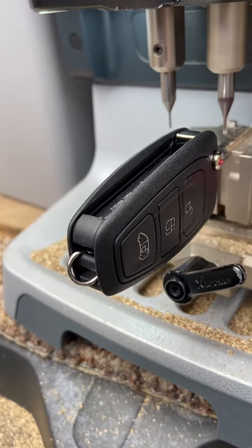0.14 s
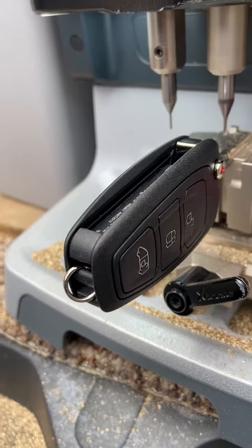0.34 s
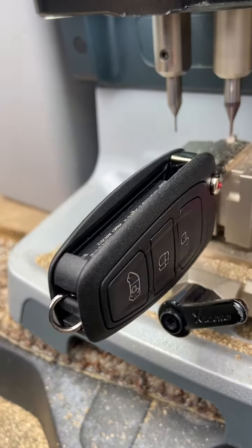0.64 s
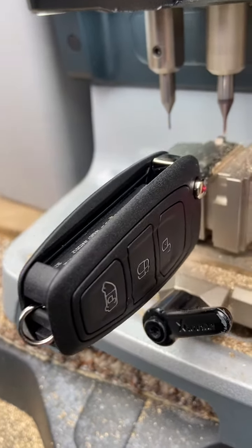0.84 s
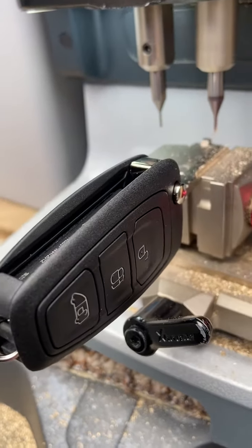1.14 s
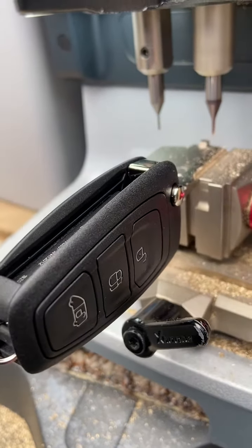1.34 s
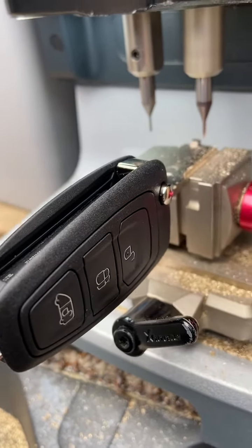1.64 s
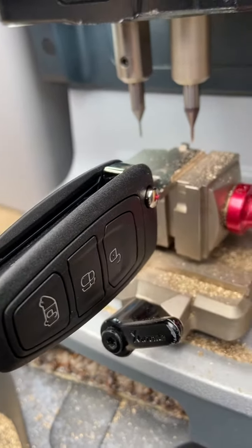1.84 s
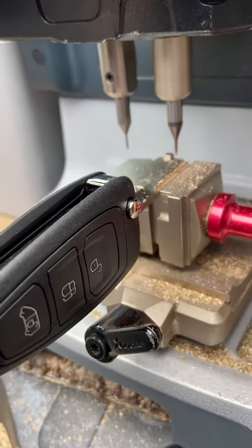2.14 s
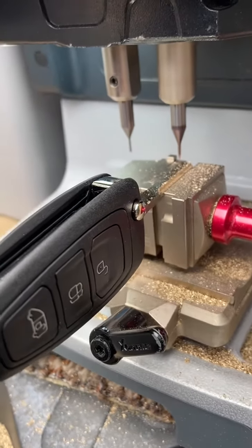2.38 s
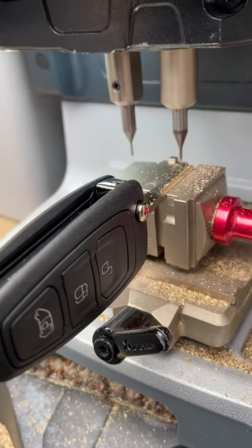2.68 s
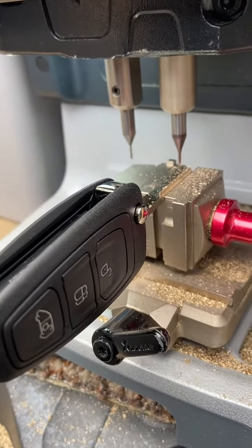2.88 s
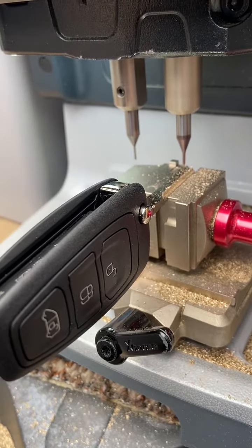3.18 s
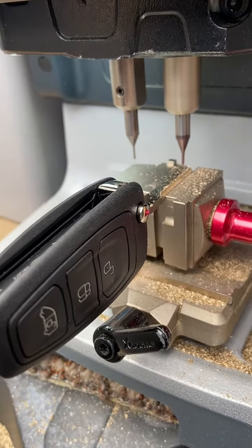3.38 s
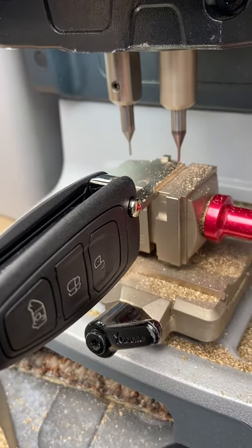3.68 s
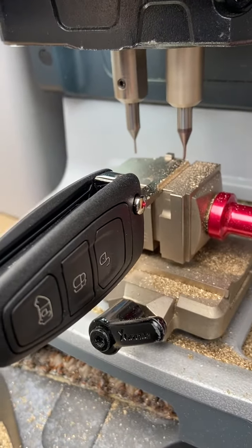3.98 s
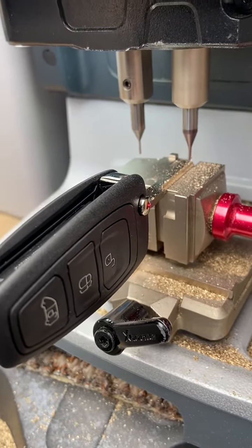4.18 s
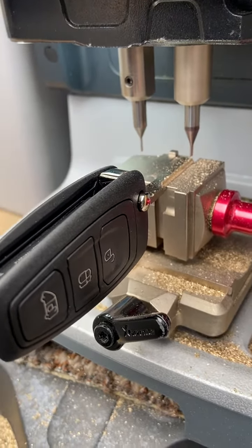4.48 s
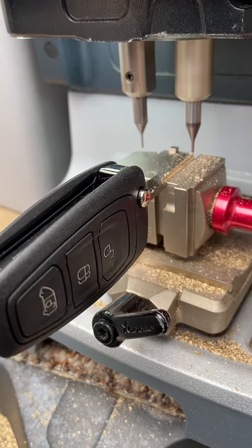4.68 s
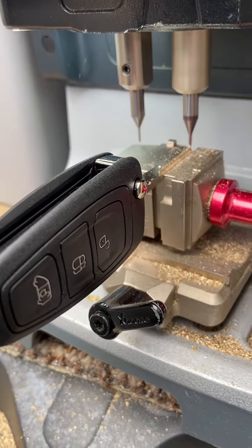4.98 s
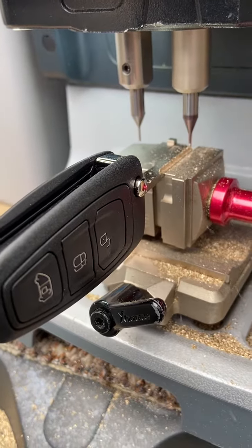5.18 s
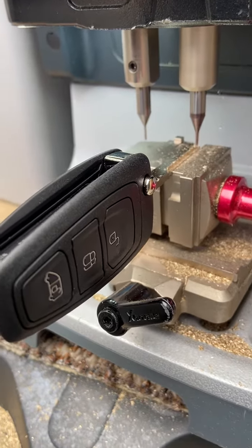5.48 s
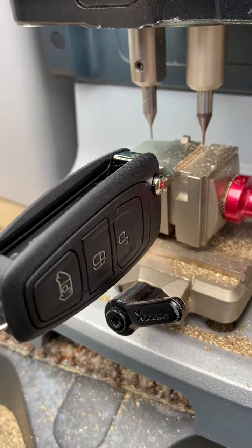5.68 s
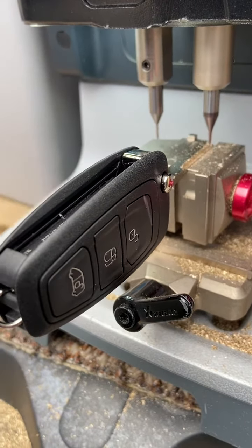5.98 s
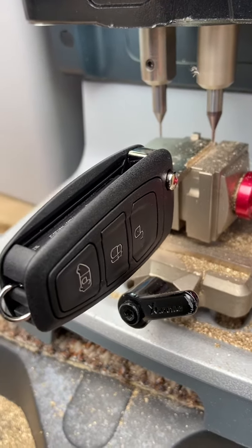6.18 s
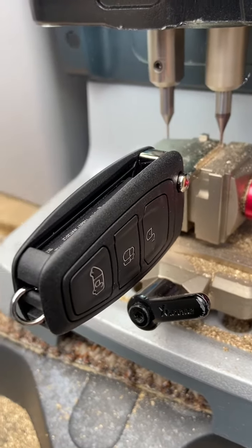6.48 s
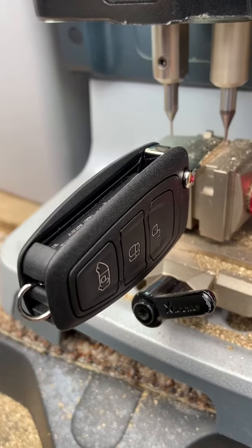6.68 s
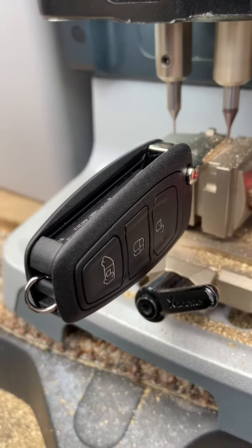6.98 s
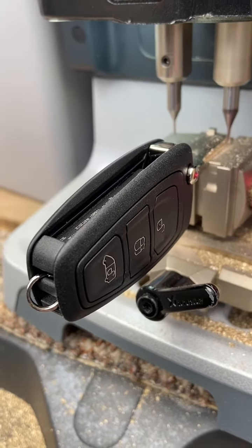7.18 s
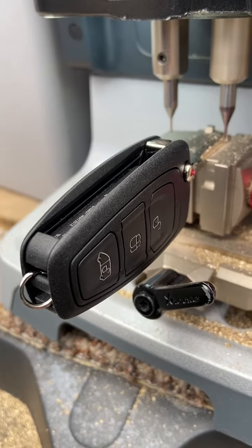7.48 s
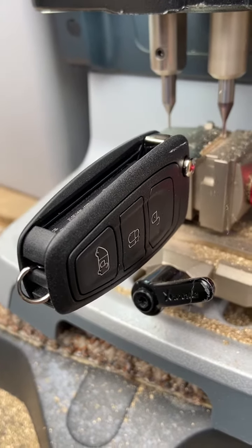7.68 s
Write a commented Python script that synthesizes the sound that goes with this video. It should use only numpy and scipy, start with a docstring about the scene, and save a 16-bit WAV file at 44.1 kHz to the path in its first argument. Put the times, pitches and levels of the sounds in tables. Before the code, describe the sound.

Close idle spindle whine and singing stepper motors under thumping air gusts; after several seconds the cutter starts grinding metal with a nasal, changing buzz.

```python
"""A key-cutting machine close to a phone: a cutter bites into a brass blade and buzzes, grinds and sprays chips.
The buzz is sines on multiples of the spindle turns; grinding and chips are noise ringing in the cast body.
The idle spindle hums, whines and rushes, and stepper motors sing at their step rate.
Short rasps of hiss and a falling chirp join in, and gusts of air (shaped noise) buffet the two microphone ports."""
import sys
import numpy as np
from scipy import signal
from scipy.fft import rfft, irfft
from scipy.io import wavfile
from scipy.ndimage import uniform_filter1d

SR = 44100
rng = np.random.default_rng(int(sys.argv[2]) if len(sys.argv) > 2 else 0)


def transcribe(u):
    """Save the signal u as a 16-bit wav file named by the first command-line argument.

    u: samples, shape (n,) or (channels, n), limited to [-1, 1]; the rate is SR.
    q: integer samples, one column per channel.
    """
    v = np.clip(np.atleast_2d(u).T, -1, 1)
    q = np.round(v * 32767).astype(np.int16)
    wavfile.write(sys.argv[1], SR, q)


N = 345744
TIME = np.arange(N) / SR  # s
FREQ = np.maximum(np.fft.rfftfreq(N, 1 / SR), 1)  # Hz

IDLE_HZ = 231.47  # spindle turns a second, unloaded
BITE_S, SETTLED_S = 4.632, 5.03  # the cutter touches the blade; its roughness changes after the bite
# resonances of cast body and cover: f/Hz, width/Hz, bearing rush level/dB, grinding level/dB
BODY = [(181, 146, 4.5, -25), (595, 254, 2.5, 2.5), (1067, 520, -2.5, -0.5), (1944, 275, 1.5, 6),
        (2430, 930, -6.5, -5.5), (3280, 800, 0.5, -4), (3720, 360, -0.5, -2.5), (4330, 1600, -5, -16),
        (4930, 650, -5.5, -9.5), (6346, 540, -4, -6), (8300, 140, -24, -2), (7420, 3700, -9.5, -14.5)]
# thin treble resonances: f/Hz, width/Hz, bearing rush level/dB, chip spray level/dB
CHIPS = [(8870, 670, -30, -11), (10620, 1220, -13, -3), (12000, 1040, -15.5, 0), (14700, 900, -16.5, 0)]


def undb(db):
    """Turn dB into gain."""
    return 10 ** (np.asarray(db) / 20)


def unit(x):
    """Scale to an rms (average strength) of 1."""
    return x / np.sqrt(np.mean(x ** 2))


def curves(rows):
    """Join the columns of a table by straight lines in time; the first column is t/s."""
    s, *columns = np.transpose(rows)
    return [np.interp(TIME, s, c) for c in columns]


def along(points):
    """Join (f/Hz, value) points by straight lines on a log frequency axis."""
    hz, value = np.transpose(points)
    return np.interp(np.log(FREQ), np.log(np.maximum(hz, 20)), value)


def walk(rate):
    """Wander at random: levels held for 1 / rate seconds, smoothed twice, with an rms of 1."""
    hold = int(SR / rate)
    steps = np.repeat(rng.standard_normal(N // hold + 1), hold)
    smooth = uniform_filter1d(uniform_filter1d(steps, hold), hold)
    return unit(smooth[:N])


def stretch(start, end, db0, db1, fade):
    """Gain that fades in, runs from one level to another and fades out."""
    window = np.clip(np.minimum(TIME - start, end - TIME) / fade + .5, 0, 1)
    return window * undb(np.interp(TIME, [start, end], [db0, db1]))


def ring(drive, modes, column, flicker_db):
    """Pass a drive through steep resonances, each flickering by itself; column picks their levels."""
    spectrum = rfft(drive)
    total = 0
    for k, mode in enumerate(modes):
        hz, width = mode[:2]
        gain = undb(mode[column] + flicker_db * walk(15))
        response = 1 / (1 + 1j * (FREQ - hz ** 2 / FREQ) / width) ** 2
        # one idle turn apart, so that neighbours do not cancel
        total = total + gain * np.roll(irfft(spectrum * response, N), int(k * SR / IDLE_HZ))
    return total


def lines(turns, orders, waver_db, rate=9, locked=False):
    """Add wavering sines on multiples of a running turn count; 0 dB is rms 1, start angles random unless locked."""
    total = 0
    for multiple, db in orders:
        gain = np.sqrt(2) * undb(db + waver_db * walk(rate))
        angle = (not locked) * rng.random()
        total = total + gain * np.sin(2 * np.pi * (multiple * turns + angle))
    return total


def airflow():
    """Gains of rumble, flutter and crosswind: calm air, spells of breeze, and bell-shaped gusts; powers add."""
    # breeze: from t/s, to t/s, rumble start level/dB, end level/dB,
    # flutter level/dB against the breeze, crosswind level/dB against the smoothed total rumble
    spells = [(-.1, 0.428, -35, -37, -34, -9.5), (.43, 1.153, -38.5, -38.5, -30, -17),
              (1.148, 1.62, -36, -42.5, -23, -14.5), (1.7, 2.34, -48, -52, -9, -10),
              (2.95, 3.282, -48, -37, -20, -9.5), (3.252, 3.668, -27.5, -35, -18, -14),
              (4.12, 4.702, -33, -23, -12, -11), (4.61, 4.902, -31, -33, -18, -9.5),
              (4.902, 5.32, -28, -34, -17, -2.5), (5.35, 5.944, -38.5, -39, -27, -10.5),
              (6.42, 6.65, -42, -49, -22.5, -18), (6.69, 6.893, -63, -49, -15, 12.5),
              (6.93, 7.6, -45, -40, -17, -13)]
    # gusts that stand out: t/s, rumble level/dB, flutter level/dB, time to fall 6 dB/ms
    gusts = [(0.021, -27.5, -51, 12), (0.292, -30, -54, 12), (0.376, -23.5, -52, 35), (0.503, -23, -46, 11),
             (0.632, -28.5, -48, 24), (0.87, -25.5, -54, 18), (1.049, -23.5, -56, 9.9),
             (1.21, -24, -38, 23), (1.302, -29, -44, 25), (1.399, -27.5, -52, 18), (1.46, -27, -53, 33),
             (1.538, -29.5, -60, 23), (3.273, -23.5, -12.5, 4.4), (3.296, -12, -23, 13.5),
             (3.327, -18, -16.5, 8.6), (3.344, -14, -18.5, 15), (3.362, -15, -20, 6.1),
             (3.488, -21, -33, 6.8), (3.543, -22, -28, 6.5), (3.595, -29, -31, 18), (4.12, -26, -18, 4),
             (4.129, -20, -44, 9.9), (4.206, -20.5, -21.5, 33), (4.262, -10.5, -16, 9),
             (4.283, -23, -17, 8), (4.351, -18, -26, 14), (4.392, -15.5, -19.5, 6), (4.342, -30, -24, 6),
             (4.415, -31, -21, 8.5), (4.44, -30, -22, 7), (4.465, -28, -25, 11), (4.5, -21, -18.5, 14),
             (4.537, -14.5, -11, 18.5), (4.608, -20, -26, 20), (4.695, -16.5, -23, 13),
             (4.752, -14, -21, 8.6), (4.875, -22.5, -31, 25), (4.981, -27, -38, 28),
             (5.044, -31, -24.5, 12), (5.076, -23.5, -43, 19), (5.132, -24, -48, 9.4),
             (5.259, -26, -45, 13)]
    calm_db, calm_flutter_db, calm_cross_db = -52.5, -71, -61.5
    spell_fade_s, cross_smear_s = 0.043, 0.094
    rise_share = 0.94  # a gust rises in this share of the time it falls

    rumble = np.full(N, undb(calm_db) ** 2)
    flutter = np.full(N, undb(calm_flutter_db) ** 2)
    turned = np.zeros(N)
    for start, end, db0, db1, flutter_db, cross_db in spells:
        breeze = stretch(start, end, db0, db1, spell_fade_s) ** 2
        rumble += breeze
        flutter += breeze * undb(flutter_db) ** 2
        turned += stretch(start, end, cross_db, cross_db, spell_fade_s) ** 2
    for s, rumble_db, flutter_db, half_ms in gusts:
        near = slice(max(int((s - .2) * SR), 0), int((s + .2) * SR))
        late = 1000 * (TIME[near] - s) / half_ms
        bell = undb(-6 * (late / np.where(late < 0, rise_share, 1)) ** 2) ** 2
        rumble[near] += bell * undb(rumble_db) ** 2
        flutter[near] += bell * undb(flutter_db) ** 2
    cross = turned * uniform_filter1d(rumble, int(cross_smear_s * SR)) + undb(calm_cross_db) ** 2
    return np.sqrt(rumble), np.sqrt(flutter), np.sqrt(cross)


def wind(rumble, flutter, cross):
    """Eddies on the ports: rumble, flutter, and a crosswind part of opposite sign left and right."""
    # tone of the rumble: f/Hz, level/dB
    rumble_tone = [(20, -23), (35, -8.5), (60, 4.5), (100, 1), (160, -3), (260, -5.5), (500, -49.5)]

    def eddies(shape_db, lump_db):
        """Noise of a given spectrum that comes in lumps."""
        noise = irfft(rfft(rng.standard_normal(N)) * undb(shape_db), N)
        # a gust holds few, even eddies: halve the swings in level (in dB) over 25 ms
        loudness = np.sqrt(uniform_filter1d(noise ** 2, size=1100))
        even = noise / loudness ** .5
        return undb(lump_db * walk(30.1)) * unit(even)

    octave = np.log2(FREQ / 300)  # octaves above 300 Hz
    # strong gusts reach higher in pitch
    high = eddies(-16 * (octave - 1.1) ** 2, lump_db=1.0) * 1.6 * flutter ** 0.9
    low_flutter = eddies(-10 * octave ** 2, lump_db=2.0)
    both = rumble * eddies(along(rumble_tone), lump_db=1.66) + 0.96 * flutter * (low_flutter + high)
    cross_low = eddies(-4 * (octave + 1.0) ** 2, lump_db=4.0)
    cross_high = 2.2 * cross ** 0.37 * eddies(-9 * (octave - .9) ** 2, lump_db=7.0)
    apart = cross * (cross_low + cross_high)
    band = signal.butter(3, [32, 1400], "bandpass", fs=SR, output="sos")
    return signal.sosfilt(band, [both + apart, both - apart])


def chirps():
    """Short falling tones as the braked motor stops: sines whose pitch slides down."""
    # from t/s, to t/s, from f/Hz, to f/Hz (each sounds at 0.94 of this), start level/dB, end level/dB
    falls = [(1.043, 1.09, 5350, 3400, -48, -51)]
    total = 0
    for s0, s1, hz0, hz1, db0, db1 in falls:
        cycles = np.cumsum(np.interp(TIME, [s0, s1], [hz0, hz1])) / SR
        total = total + stretch(s0, s1, db0, db1, .01) * lines(cycles, [(0.94, 0)], waver_db=6.0, rate=120)
    return total


def scrape():
    """Short rasps: noise through one resonance, swelling and fading as a bell."""
    # centre t/s, f/Hz, width/Hz, level/dB, half length/s
    rasps = [(1.3, 5700, 350, -42, .006), (0.92, 5150, 350, -46, .008), (5.77, 10500, 6000, -42, .015),
             (4.637, 1910, 250, -30, .005), (7.425, 3600, 600, -37, .014)]
    total = 0
    for s, hz, width, db, half in rasps:
        bell = np.exp(-((TIME - s) / half) ** 2)
        hiss = unit(ring(rng.standard_normal(N), [(hz, width, 0)], column=2, flicker_db=2))
        total = total + undb(db) * bell * hiss
    return total


def carriage():
    """Stepper motors sing at multiples of their step rate; braking, they slide down and change colour."""
    # each move: (from t/s, brakes at t/s, to t/s, steps f/Hz), (start level/dB, end level/dB),
    # then sounding lines: multiple of the step rate, level/dB, change when fully braked/dB
    moves = [((-.1, .865, 1.055, 1330), (-44, -44), [(1, 0.5, -10), (2, -9, -30), (3, -4, -50),
             (4, -8, -38)]), ((-.1, .09, .232, 1330), (-48, -45), [(.5, -7, 9), (1, 0.5, -8), (2, -6, 12)]),
             ((1.125, 9, 2.79, 1199), (-42, -43), [(.5, -13.5, 0), (1, -20, 0), (2, 0.5, 0), (3, -18, 0),
             (4, 1.5, 0)]), ((2.8, 9, 4.62, 1187.5), (-44.5, -45), [(.25, -1.5, 0), (1, -0.5, 0),
             (2, -8.5, 0), (3, -10, 0), (5, -19, 0)]), ((6.6, 9, 7.01, 1160), (-48, -36.5), [(.25, 0, 0)]),
             ((4.7, 9, 6.12, 1181.8), (-54, -55), [(4, 0, 0)]), ((6.12, 9, 6.55, 1199.3), (-54, -54),
             [(4, 0, 0)]), ((6.98, 9, 7.42, 1199.3), (-52, -52), [(4, 0, 0)]), ((7.4, 9, 7.75, 1186),
             (-55, -55), [(4, 0, 0)])]
    brake_hz_per_s, brake_ease_s, creep_hz = 8500, .3, 765  # braking sets in gently, down to a creep at most
    slide_hz, slide_width_hz, slide_db = 790, 60, 16  # the slide rings when a line passes its pitch
    total = 0
    for (start, brake, end, top_hz), (db0, db1), orders in moves:
        late = np.maximum(TIME - brake, 0)
        hz = np.maximum(top_hz - brake_hz_per_s * late ** 2 / (late + brake_ease_s), creep_hz)
        braked = (top_hz - hz) / (top_hz - creep_hz)  # 0 at full speed, 1 at the creep
        heard = []
        for multiple, line_db, change_db in orders:
            boost_db = slide_db * np.exp(-((multiple * hz - slide_hz) / slide_width_hz) ** 2)
            heard.append((multiple, line_db + change_db * braked + boost_db))
        gain = stretch(start, end, db0, db1, .02) * undb(2.3 * braked * walk(30.6))
        total = total + gain * lines(np.cumsum(hz) / SR, heard, waver_db=0.85, locked=True)
    return total


def spindle(turns, gust_db):
    """Unbalance hums once a turn, poles whine on multiples, bearings rush as noise, drive tones stay steady."""
    # the machine as the phone drifts about: t/s, motor whine level/dB, bearing rush level/dB
    nearness = [(0, -39, -39), (.5, -38, -39.5), (1.5, -39.5, -40), (2.7, -43.5, -39.5),
                (3.25, -44.5, -38.5), (3.45, -43.5, -39.5), (4.1, -45, -39), (4.6, -45, -38.5),
                (4.8, -44, -38), (5.3, -44.5, -39), (6.5, -44.5, -40.5), (7.3, -43.5, -38.5),
                (7.84, -39.5, -33)]
    # motor whine: multiple of the turn rate, level/dB against the whine level above
    whine_lines = [(10.5, -3.5), (21, 0), (21.655, -17), (42, -24), (63, -36)]
    # steady drive tones: f/Hz, level/dB at the start (then they follow the bearing rush)
    tones = [(522.6, -53.5), (604, -51), (904, -58.5), (3596, -59.5), (1906, -55.5), (6380, -58),
             (10100, -64)]
    # a motor line that follows the rush in the same way: multiple of the turn rate, level/dB at the start
    steady_line = (18.75, -54)
    hum_db, hum_duck = -34, 0.21  # hum level; dB lost for each dB of gust above -33 dB

    whine_db, rush_db = curves(nearness)
    # the hum sinks while a gust is loud; under load the run-out of the cutter takes its place
    gust_excess_db = uniform_filter1d(np.maximum(gust_db + 33, 0), size=6000)
    hum = (TIME < BITE_S) * undb(hum_db - hum_duck * gust_excess_db) * lines(turns, [(1, 0)], waver_db=0.0)
    rush = unit(ring(rng.standard_normal(N), BODY + CHIPS, column=2, flicker_db=1.5))
    jittered_time = TIME + 2e-5 * walk(25)
    steady = lines(jittered_time, tones, waver_db=1.0) + lines(turns, [steady_line], waver_db=1.5)
    whine = undb(whine_db) * lines(turns, whine_lines, waver_db=1.1)
    return hum + whine + undb(rush_db) * rush + steady * undb(rush_db - rush_db[0])


def groove():
    """Levels in dB of grinding, chips and each buzz line in time: the powers of the groove's stretches add."""
    # ways the groove loads the cutter, named for their sound: grinding level/dB and chip hiss level/dB,
    # both against the buzz, then the level/dB of each buzzing multiple
    patterns = {"nasal": (-9, -21, (-11, -3, -19.5, -32, -11.5, -17.5, -16, -17, -19, -26, -32, -33, -20, -20, -24, -26, -35, -36, -38, -34)),
                "bright": (-7, -17, (-5, -13, -25, -21, -11, -16, -20, -14, -13.5, -8, -9.5, -19, -22, -28, -26, -22, -33, -31, -35, -28)),
                "full": (-8.5, -22, (-26, -11, -12.5, -29, -10.5, -22, -24, -16.5, -24, -12, -19.5, -23, -25, -31, -31, -31, -38, -37, -37, -33)),
                "plunge": (-8.5, -8.5, (-19.5, -12, -15, -15.5, -11.5, -14, -15.5, -13, -9, -11.5, -9.5, -10, -17, -14, -13, -16.5, -32, -32, -28, -31)),
                "squeal": (-19, -14, (-21.5, -13, -17.5, -10, -11.5, -23, -19.5, -28, -23, -10, -15, -11.5, -14.5, -24, -32.5, -25, -27, -27, -28, -32))}
    # stretches: pattern, from t/s, to t/s, buzz start level/dB, end level/dB
    stretches = [("full", 4.7, 4.74, -27, -26), ("squeal", 4.7, 4.78, -28, -28),
                 ("nasal", 4.66, 4.76, -23.5, -30), ("plunge", 4.68, 4.86, -27, -21),
                 ("plunge", 4.84, 4.98, -19.5, -29.5), ("full", 4.96, 5.6, -26.5, -29),
                 ("nasal", 4.92, 5.62, -31, -32.5), ("squeal", 4.97, 5.6, -38, -36),
                 ("bright", 5.56, 6.62, -33.5, -32), ("full", 5.58, 6.6, -30.5, -37.5),
                 ("nasal", 6.59, 7.02, -28, -35), ("bright", 6.68, 6.86, -33, -42.5),
                 ("squeal", 6.64, 6.89, -41, -27), ("squeal", 6.99, 7.43, -27, -26),
                 ("full", 7.46, 7.9, -26.5, -24.5), ("bright", 7.44, 7.9, -33, -39),
                 ("squeal", 7.36, 7.9, -42, -41)]
    power = []
    for name in patterns:
        power.append(sum(stretch(*row[1:], 0.061) ** 2 for row in stretches if row[0] == name))
    share = np.array([[grind_db, chip_db, *orders] for grind_db, chip_db, orders in patterns.values()])
    return 10 * np.log10(undb(share.T) ** 2 @ np.array(power) + 1e-12)


def milling(turns, runout_db, flute_db):
    """The flutes strike the same way every turn, which buzzes; brass grinds and chips hiss in puffs."""
    # multiples of the turn rate that the groove shapes
    buzzing = (2, 4, 6, 7, 9, 10, 11, 12, 13, 15, 16, 17, 18, 20, 21, 23, 24, 25, 26, 27)
    # lines at which the cutter sings out: t/s, then level/dB of multiples 5, 8, 14, 19 and 22 of the turn
    sing = [(4.63, -37, -34, -52, -47, -52), (4.67, -36, -37, -43, -43, -43),
            (4.72, -30, -23.5, -33, -36, -34), (4.77, -37, -32, -33, -37, -42),
            (4.82, -35, -24, -32, -31, -35), (4.86, -32, -27, -37, -25, -29),
            (4.91, -40, -28, -33, -26, -33), (4.96, -35, -33, -30, -42, -46),
            (5.06, -32, -31, -41, -54, -55), (5.45, -37, -35.5, -40, -48, -56),
            (5.72, -38, -43, -52, -41.5, -48), (5.98, -37, -48, -48, -47, -51),
            (6.54, -35, -40, -46, -41, -49), (6.62, -45, -47, -40, -45, -51),
            (6.7, -54, -38, -32, -45, -50), (6.82, -47, -30, -43, -40, -42),
            (6.9, -50, -37, -33.5, -47, -50), (6.95, -48, -45, -50, -54, -54),
            (7.0, -44, -35, -36, -47, -52), (7.05, -43, -28, -46, -46, -53),
            (7.41, -39, -28, -48, -48, -50), (7.46, -34.5, -41, -42, -48, -50),
            (7.56, -28, -33.5, -50, -43, -48), (7.83, -25.5, -24.5, -47, -43, -48)]
    # flying chips: t/s, treble hiss level/dB
    spray_levels = [(4.63, -42), (4.68, -36), (4.88, -37.5), (5.0, -43.5), (5.6, -44), (6.1, -43.5),
                    (6.8, -44), (7.0, -41.5), (7.83, -38.5)]
    biting = TIME < SETTLED_S
    chatter_db = np.where(biting, 4, 2)
    sing_waver_db = np.where(biting, 1.6, 0.7)
    grit_db = np.where(biting, 1.5, 1.4)  # spread of the grinding bursts

    grind_db, chip_db, *buzz_db = groove()
    buzz = lines(turns, zip(buzzing, buzz_db), waver_db=chatter_db, rate=28) * undb(0.77 * walk(70))
    # run-out shakes once a turn, the three flutes three times
    thrum = lines(turns, [(1, runout_db), (3, flute_db)], waver_db=0.38)
    puff = np.exp(0.049 * np.cos(2 * np.pi * turns) + 1.07 * np.cos(6 * np.pi * turns))
    grind = unit(ring(puff * rng.standard_normal(N), BODY, column=3, flicker_db=3.0)) * undb(grit_db * walk(45))
    # a sharp tick each turn carries the buzz up into the treble
    tick = np.sin(141 * np.pi * turns) / np.sin(np.pi * turns)
    chip_drive = puff * rng.standard_normal(N) + .075 * tick
    chips = unit(ring(chip_drive, BODY[-5:], column=3, flicker_db=1.2))
    spray_drive = np.sqrt(puff) * rng.standard_normal(N) + 0.049 * tick
    spray = unit(ring(spray_drive, CHIPS, column=3, flicker_db=2.5))
    spray = spray * undb(curves(spray_levels)[0] + 1.6 * walk(12))
    singing = lines(turns, zip((5, 8, 14, 19, 22), curves(sing)), waver_db=sing_waver_db, rate=30)
    cut = buzz + singing + undb(grind_db) * grind + thrum + undb(chip_db + 1.0 * walk(10)) * chips + spray
    return (TIME > BITE_S) * cut


def ports(x):
    """Left and right differ in phase and level from pitch to pitch; a noisy tail is added with opposite signs."""
    # f/Hz, left minus right phase/radians
    phase_gap = [(0, 0), (430, -0.3), (950, 0.4), (1980, -0.0), (2760, 1.3), (3010, 0.9), (5600, 0.2),
                 (6370, 2.8), (8180, 3.3), (9220, 6.0), (11500, 6.5), (12600, 9.2), (14400, 9.5),
                 (15600, 12.6)]
    # f/Hz, left minus right level/dB
    level_gap = [(60, 0.0), (110, -2), (200, 0.5), (380, -8.5), (700, -4.5), (1290, -1.5), (2380, 0),
                 (4400, -0.5), (8120, -1.5), (15000, 1)]
    # noisy tail: f/Hz, level/dB
    tail_levels = [(60, -38), (300, -28), (700, -20), (1500, -26), (3100, -16), (6000, -19), (9000, -20),
                   (13000, -11)]
    spectrum = rfft(x)
    # each side takes half of the difference
    half = np.exp(.5j * along(phase_gap)) * undb(along(level_gap) / 2)
    decay = rng.standard_normal(12000) * np.exp(-np.arange(12000) / 2500)
    tail = spectrum * rfft(decay / np.linalg.norm(decay), N) * undb(along(tail_levels))
    return np.array([irfft(spectrum * half + tail, N), irfft(spectrum / half - tail, N)])


def scene():
    """The machine spread over left and right, with wind on the ports."""
    # the cutter under load: t/s, spindle turns f/Hz, run-out level/dB, flutes level/dB
    cutting = [(4.625, 230.6, -43, -45), (4.7, 230.2, -41, -27.5), (4.8, 229.6, -44, -22),
               (5.0, 229.5, -41.5, -28), (5.65, 230.1, -31.5, -25.5), (6.0, 230.6, -26.5, -25.5),
               (6.52, 230.6, -26, -26.5), (6.8, 231.2, -28.5, -31), (6.96, 231.6, -27.5, -39),
               (7.02, 231.4, -28, -32), (7.4, 231.3, -25, -32), (7.5, 230.7, -23.5, -26),
               (7.62, 230.2, -22.5, -29), (7.69, 230.2, -23.5, -36.5), (7.83, 229.7, -25.5, -23.5)]
    belt_slip = .5  # the motor sags by this share of what the cutter sags
    hz, *load = curves(cutting)
    hz = np.where(TIME < BITE_S, IDLE_HZ, hz) * (1 + 0.00021 * walk(12))
    turns = np.cumsum(hz) / SR
    motor_turns = np.cumsum(IDLE_HZ + belt_slip * (hz - IDLE_HZ)) / SR
    rumble, flutter, cross = airflow()
    machine = spindle(motor_turns, 20 * np.log10(rumble)) + carriage() + milling(turns, *load)
    machine = machine + scrape() + chirps()
    return ports(machine) + wind(rumble, flutter, cross)


def record(dry):
    """The phone rounds the loudest gusts and cuts the treble above 15750 Hz."""
    rounded = .95 * np.tanh(dry / .95)
    return signal.sosfilt(signal.ellip(10, .2, 80, 15750, fs=SR, output="sos"), rounded)


dry = scene()
out = record(dry)
transcribe(out)
```